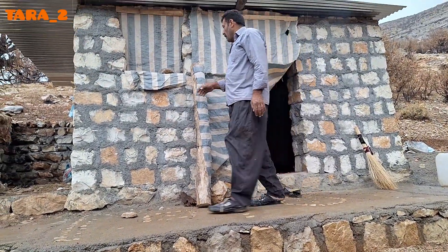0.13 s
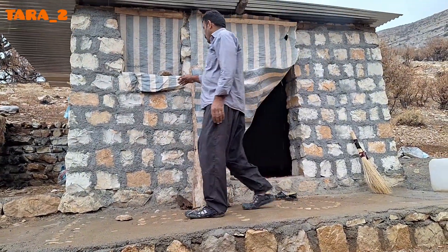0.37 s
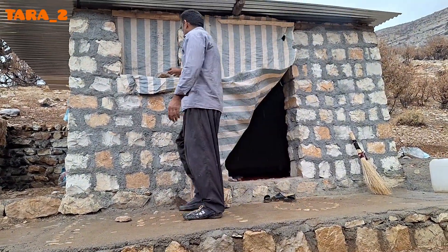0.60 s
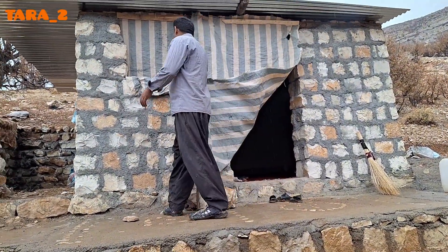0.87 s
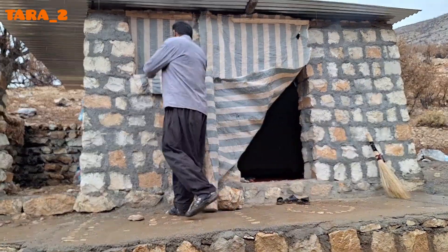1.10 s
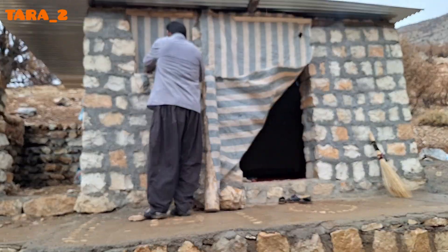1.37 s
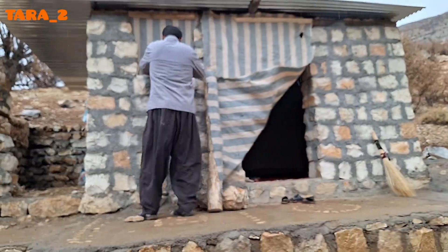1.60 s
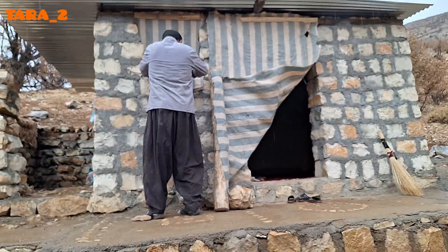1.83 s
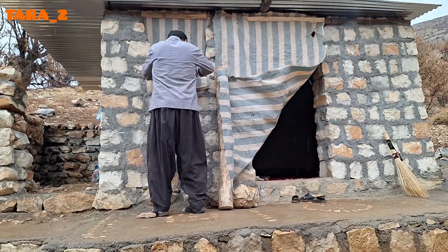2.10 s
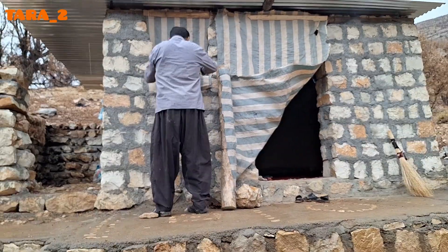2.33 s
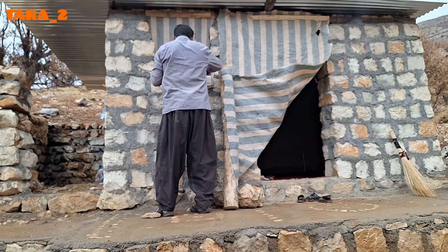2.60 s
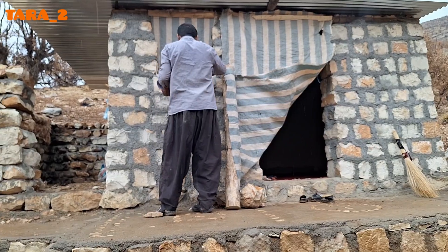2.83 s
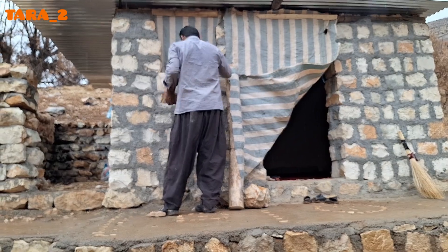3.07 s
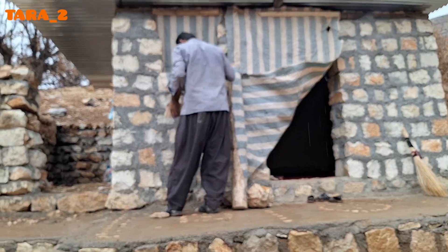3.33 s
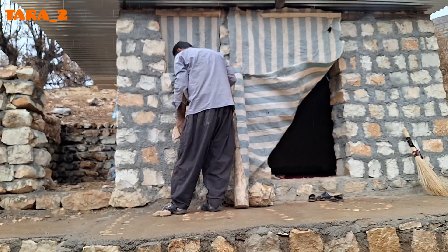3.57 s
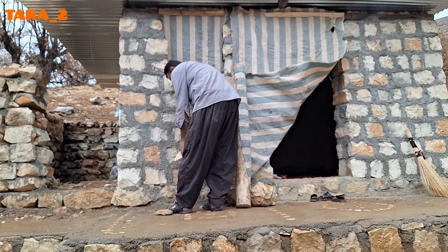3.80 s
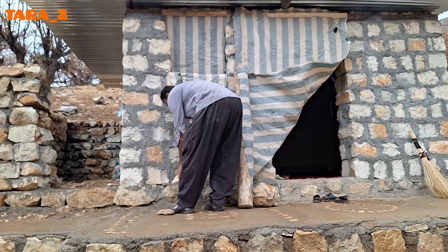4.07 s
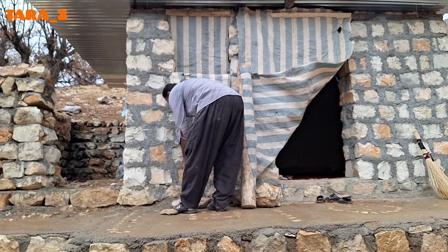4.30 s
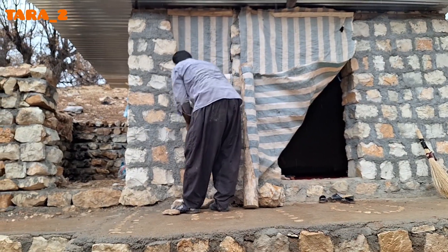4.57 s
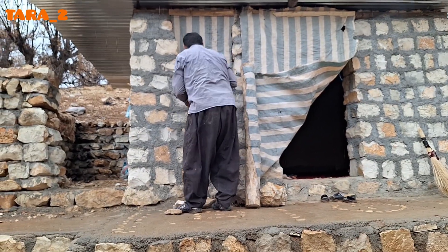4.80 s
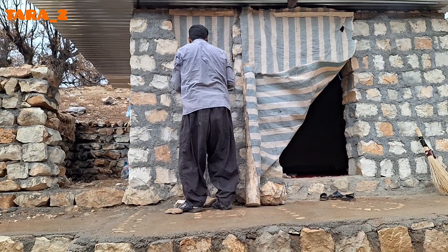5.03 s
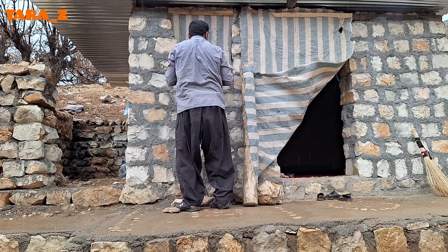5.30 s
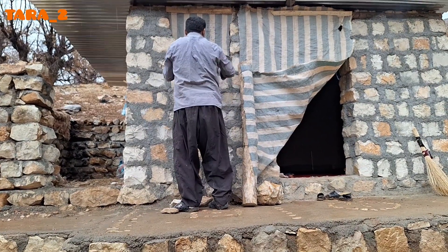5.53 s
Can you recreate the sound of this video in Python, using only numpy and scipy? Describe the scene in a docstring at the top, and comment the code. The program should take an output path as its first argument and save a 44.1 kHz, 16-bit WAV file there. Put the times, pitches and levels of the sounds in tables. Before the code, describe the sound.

Close stereo sound outdoors by a stone wall, with a very soft hiss of light rain and sparse tiny ticks throughout. From the start a woven plastic tarp crackles: sharp, dry crease snaps at irregular spacing, with rustling bursts and low, loose flaps. Soles scuff gritty concrete at about 0.1-0.3 s and again near 0.75 s. Snaps crowd together between 1.3 and 1.8 s, with a fuller rustle and flap around 2.2 s. Handling continues more thinly, swelling near 3.2 and 3.7 s, with more crisp snaps around 4 s. At 4.28 s a stone drops on the concrete, the loudest event: a low thud and hard, gritty knock, a strong second hit at 4.32 s, a bright stone clink near 4.37 s, then weaker bounces to 4.53 s and a faint last tap at 4.7 s. Short dull echoes follow. Sparse crackles and a light flap finish by 5.6 s.

```python
"""First to be heard are creases snapping in a woven plastic tarp, over a soft hiss of light rain.
A man handles the tarp outdoors by a stone wall: it rustles and flaps, and his soles scuff the concrete.
Later a stone that weighed it down is dropped on the concrete, bounces, clinks on another stone and settles.
Cracks are short noise bursts, rustle is clumped grains, sheet and stone are ringing modes, rain is
banded noise. Two microphones pick it up, with a few echoes off wall and ground."""
import sys
import numpy as np
from scipy import signal
from scipy.fft import rfft, irfft
from scipy.io import wavfile
from scipy.ndimage import uniform_filter1d, minimum_filter1d

SR = 44100
rng = np.random.default_rng(int(sys.argv[2]) if len(sys.argv) > 2 else 0)


def log_audio(samples):
    """Write samples as a 16-bit WAV file to the path given in sys.argv[1]."""
    # one column per channel
    frames = np.atleast_2d(samples).T
    # limit to full scale, then quantise
    limited = np.clip(frames, -1, 1)
    pcm = np.round(limited * 32767).astype(np.int16)
    wavfile.write(sys.argv[1], SR, pcm)


def volts_from_decibels(level):
    """Turn decibel levels (scalar or array-like) into linear amplitude factors."""
    exponent = np.asarray(level, float) / 20
    return 10 ** exponent


N = 249606

# light rain, spectrum shape: [f/Hz, level/dB]
RAIN_SPECTRUM = [(18, -35), (30, -6), (76, 8), (350, -9.5), (694, -5), (1180, -2), (2600, -1.5),
                 (5890, -10.5), (7280, 1), (9230, -21.5), (14100, -15.5), (15200, -13), (16500, -30)]
RAIN_DB = -62  # rms of the hiss on its way to the microphones
# how alike the rain is left and right: [f/Hz, likeness, clipped to -1 (opposite) .. 1 (same)]
RAIN_LIKENESS = [(60, 0.96), (180, 1), (550, -0.41), (1650, -0.75), (4970, -1.4), (15000, -1.8)]
# big creases that snap: [t/s, crack level/dB, body over crack/dB, treble over crack/dB, left over right/dB]
BIG_SNAPS = [(0.0218, -22, 0, -1, 2.5), (0.075, -35, -5.5, -9, 3), (0.096, -36, -3, 9, -1),
             (0.1443, -28, -8, -13, -10), (0.1546, -37, 2, -17, 13), (0.1763, -35, -9, -3, -15),
             (0.2776, -37, 5.5, -10, 1), (.3069, -46, -10, 2, 6), (0.3202, -31, -2, -2, 1),
             (0.3253, -21.5, -3.5, -1.5, 6.5), (0.3424, -35, -19, -8, -9), (0.3748, -39.5, -9, 5, -4),
             (0.461, -32, -9, 0, -1), (0.4785, -27.5, -4, -9, 2), (0.5623, -30.5, -10, -17, 3),
             (0.6284, -32.5, -7, -3, 3), (0.7737, -20.5, -27, -16, -1.5), (0.9066, -28, -13, -5, 4),
             (0.9387, -23.5, 0.5, -12, 3), (0.9482, -30, -27, 3, 0), (1.0051, -34, -8, -4, 2),
             (1.0361, -35, -5, -10, 0), (1.0682, -34.5, -5.5, -13, -4), (1.3366, -36, -5.5, -4, -3),
             (1.3507, -32.5, 3, 8.5, 0), (1.3602, -39, -1, 3, -2), (1.408, -37, 5, -10, 3),
             (1.4207, -34.5, 8, -24, -2), (1.447, -28.5, 2, -18, -1), (1.468, -31.5, 4, -11, 3),
             (1.4949, -36, 3, -13, -1), (1.5234, -33, -21, -5, -10), (1.569, -22.5, 0.5, -6, 0),
             (1.6522, -30, -3.5, -4, -1), (1.6761, -36, -10, 10, 0), (1.7097, -24, -2.5, -14, 1.5),
             (1.7285, -25, 0, 0.5, 2.5), (1.7738, -26.5, 2.5, -20, 1.5), (1.8236, -26.5, -7, -15, 2.5),
             (1.971, -34.5, -21, -4, 0), (2.0666, -33.5, -10, -5, 2), (2.252, -33, -3, -4, 2),
             (2.4186, -36, -18, -6, 3), (2.546, -34, -22, -4, 3), (2.5562, -36.5, -10, -2, 5),
             (2.6286, -33.5, -11.5, -11, 4), (2.6587, -31.5, -12, -5, 7), (2.7715, -43, 5, -6, 3),
             (2.8141, -27, -2.5, -6, 2.5), (2.8354, -31.5, -5, 2, 6), (2.9637, -37.5, -0.5, 0, 1),
             (3.1056, -32, 0, -7, 4), (3.1329, -28.5, -3.5, -13, 0), (3.1933, -25, 0.5, -4, 2.5),
             (3.2428, -38, -4, 0, 2), (3.3094, -37, -11, -6, 1), (3.335, -32.5, -11, 0, 6),
             (3.4423, -33, -28, -11, 5), (3.4488, -30, -2, 8.5, 1), (3.5058, -28.5, -10.5, -17, 2),
             (3.5551, -30, -8, -1.5, 4), (3.6727, -26.5, -12.5, -26, 1), (3.7665, -33, -15, -10, 3),
             (3.8362, -33, -4, 1.5, 7), (3.8483, -34.5, -1.5, -12, -1), (3.9281, -24, -13, -5, 0.5),
             (3.9395, -34, -19, -12, 5), (3.9721, -27.5, -2, 6, 1), (3.9864, -30, -9, -9, 6),
             (4.0615, -37, -26, -8, -9), (4.0756, -33, -3, -11.5, 4), (4.1063, -31.5, -11, -4, 0),
             (4.1895, -32.5, -5, -5, -1), (4.5395, -33.5, -18, -1, 7), (4.5977, -31.5, -14, -18, 0),
             (4.8092, -36.5, -15, -5, 3), (4.8338, -38, -12, -2, 5), (5.007, -27, 0, 3, 6),
             (5.0958, -33, 0, -11, 5.5), (5.2498, -36, -4, -9, 8), (5.3886, -46, 5.5, 8.5, 0),
             (5.5606, -29.5, -9, -4, 6), (5.5681, -32.5, -7, -7.5, -0.5)]
# small creases, snapping at random; rows are crack level, body, treble and left over right: [mean/dB, spread/dB]
SMALL_SNAP_SPREAD = [(-44, 2), (-9, 6), (-4, 5.8), (3, 1.9)]
SMALL_SNAP_COUNT = 120
# echoes off wall and ground: [delay/s, level/dB]
ECHOES = [(.0072, -16), (0.013, -18.5), (0.021, -20.5), (.027, -46.5), (.039, -24)]
# soles scuffing the concrete, one curve per scuff: [t/s, level/dB]
SCUFF_CURVES = [
    [(.088, -90), (.096, -42), (.13, -51), (.18, -52), (.24, -40), (.27, -53), (.3, -98)],
    [(.74, -97), (.765, -45), (.775, -47), (.8, -59), (.83, -88)],
]
# resonances the sole rasps with: [f/Hz, width/Hz, level/dB]
SOLE_BANDS = [(740, 150, 0), (2280, 480, 7.5), (4330, 1200, 0)]
# colour of the rustling: [f/Hz, level/dB]
RUSTLE_SPECTRUM = [(150, -32), (250, 7), (349, -10.5), (408, 0), (809, 3.5), (1210, -2), (2280, 1),
                   (7900, -12), (9250, -20), (12000, -10.5), (15400, -16), (16500, -41)]
# rustling swells: pulls on the sheet and, at 4.3 s, crunch under the dropped stone:
# [start t/s, length/s, level at the end/dB, swell on the way/dB, treble over rustle/dB]
RUSTLE_SWELLS = [(.096, 0.14, -41, 9.5, 2), (.165, 0.018, -45.5, -3, 4), (.34, 0.067, -63.5, 2, 2),
                 (.45, 0.091, -57.5, 1, -5), (.6, 0.064, -55.5, 7, -4), (.69, 0.098, -45.5, 11.5, 0.5),
                 (.99, 0.091, -54, 12, -2), (1.26, 0.0096, -56.5, -2, -0.5), (1.35, 0.1, -39.5, 12, -9.5),
                 (1.47, 0.099, -49.5, -6, -5), (1.65, 0.065, -58.5, -5, -5.5), (1.75, 0.015, -46.5, 28, -7),
                 (1.96, 0.0089, -53, -4, -3), (2.08, .1, -55.5, 7, 3), (2.19, 0.13, -48.5, 7.5, -2),
                 (2.39, 0.12, -62, 5.5, -1), (2.6, 0.13, -62, 5, -1.5), (2.82, 0.13, -56.5, 9.5, 2.5),
                 (3.0, .14, -51.5, 0, -2.5), (3.15, 0.027, -54, 2, -7), (3.31, .03, -60.5, -1, -4),
                 (3.45, 0.29, -51.5, 14, -2.5), (4.08, 0.16, -66, 2, 0), (4.3, .17, -48.5, -5, -13),
                 (4.48, 0.062, -58.5, 2, -3.5), (4.62, 0.052, -66.5, -8.5, -14),
                 (4.76, .2, -72, -4.5, -7.5), (5.25, 0.16, -58.5, 13, -0.5)]
SWELL_RISE_DB_PER_S, SWELL_FALL_DB_PER_S, RESTING_RUSTLE_DB = 904, 303.5, -71.5
# flaps of the sheet: [start t/s, length/s, level at the end/dB, swell on the way/dB, tautness/dB per octave]
SHEET_FLAPS = [(.096, 0.15, -51.5, 3, -4), (.32, 0.013, -50, 6, -4), (.722, 0.0081, -44, 10, 9),
               (.778, 0.011, -51.5, 0, -2), (.934, 0.018, -58, 6, -6), (1.35, 0.2, -54, 4, 8),
               (1.6, 0.15, -51.5, 8, -2.5), (1.865, 0.018, -53.5, -1, 3), (1.94, 0.041, -45.5, 13, -0.5),
               (2.09, .015, -56, -5, 2), (2.15, 0.16, -41.5, 4.5, -0.5), (2.39, 0.18, -67, -0.5, -9.5),
               (2.74, 0.013, -61, -2, 5), (2.81, 0.4, -48, 16, 0.5), (3.6, 0.17, -75, -11, 5),
               (4.25, 0.4, -56, 20, -5), (4.75, 0.096, -71.5, -4, -10), (5.005, 0.013, -65, 2, -11),
               (5.15, 0.28, -65.5, 17, 5)]
FLAP_RISE_DB_PER_S, FLAP_FALL_DB_PER_S, RESTING_FLAP_DB = 900, 346, -76
# the slack sheet as a drum, its low modes: [f/Hz, level/dB, t60/s]
SHEET_MODES = [(68.6, 2, 0.089), (118, -7, 0.17), (158.4, 3.5, 0.1), (203, -6.5, 0.12), (281, -9.5, 0.017),
               (190.4, -5.5, 0.15)]
# a big snap stirs the sheet for a moment: rustle and flap relative to its crack level
STIR_S, STIR_RUSTLE_DB, STIR_FLAP_DB = 0.01, -29.5, -41
# blows of the stone: [t/s, thud level/dB, knock level/dB, knock tilt/dB per octave]
STONE_BLOWS = [(4.2804, -4, -16, -0.5), (4.2936, -22, -28.5, -24), (4.3207, -2.5, -11, -4.5),
               (4.334, -23, -15, -1.5), (4.339, -10, -24, 2), (4.3674, -15, -14, 1),
               (4.4183, -15, -23.5, -7), (4.472, -13, -19.5, -18), (4.508, -28, -38, -6),
               (4.529, -31, -34, -7.5), (4.717, -32.5, -39.5, -12)]
# modes of the ground under the blow: [f/Hz, level/dB, t60/s]
GROUND_MODES = [(75, -11, 0.042), (129, -3, 0.087), (145, -5, .06), (177, -3, 0.074), (252, -5, 0.078),
                (325, -9.5, .04), (432, -11.5, 0.046)]
# the stone's duller modes: [f/Hz, level/dB, t60/s]
KNOCK_MODES = [(490, -0.5, 0.01), (597, 1.5, 0.053), (690, 0, 0.019), (850, -0.5, .045), (950, -7, 0.031),
               (1147, -5.5, 0.055), (1380, -6, 0.046), (1690, -3.5, 0.026), (2120, -10.5, 0.021)]
# crunch under the stone, by octave: [f/Hz, level/dB, t60/s]
GRIT_BANDS = [(394, -11.5, 0.12), (840, -4.5, 0.067), (1580, -0.5, 0.043), (3130, -10.5, .05),
              (6400, -31.5, 0.071)]
# stone on stone: [t/s, then level/dB of each of the five clink groups]
STONE_CLINKS = [(4.2816, -61, -55, -38, -59, -38), (4.332, -37, -21, -31, -20.5, -40),
                (4.3666, -6, -33, -15.5, -49.5, -37), (4.408, -50.5, -42.5, -49, -47.5, -56.5),
                (4.474, -64.5, -51.5, -41, -60, -65), (4.507, -60.5, -55, -57, -64, -64)]
# the stone's clink modes, in groups struck together: [f/Hz, level/dB, t60/s]
CLINK_GROUPS = [
    [(2798, 0, .075)],
    [(2882, 0.0017, 0.17)],
    [(4020, 0, 0.064), (4110, -18, 0.18)],
    [(4770, -0.5, .07), (4820, -21, 0.26)],
    [(5520, 2, 0.11), (5680, -6.5, .07)],
]
# balance of the two microphones: [f/Hz, left over right/dB]
MICROPHONE_LEAN = [(60, 4), (110, -0.5), (200, -0.5), (380, -1), (700, -2.5), (1290, -2.5), (2380, -6.5),
                   (4400, -7.5), (8120, -6), (15000, -18.5)]
CEILING_DB, LOOK_AHEAD_S = -1.5, 0.004


def in_time(rows):
    """Columns of a curve table at every sample."""
    s, *columns = np.transpose(rows)
    return [np.interp(np.arange(N) / SR, s, column) for column in columns]


def at_hz(points, hz):
    """A spectrum read on a log-frequency axis."""
    point_hz, values = np.transpose(points)
    return np.interp(np.log(hz + 1), np.log(point_hz), values)


def rms_one(x):
    """Scaled to rms 1, all channels together."""
    return x / np.sqrt(np.mean(np.square(x)) + 1e-20)


def band(x, low_hz, high_hz):
    """Butterworth band-pass."""
    sos = signal.butter(2, [low_hz, min(high_hz, 0.45 * SR)], "band", fs=SR, output="sos")
    return signal.sosfilt(sos, x)


def low_pass(x, hz):
    """Butterworth low-pass."""
    return signal.sosfilt(signal.butter(2, hz, fs=SR, output="sos"), x)


def colour(x, db_at):
    """Causal (minimum-phase) filter with the given dB at each frequency."""
    cepstrum = irfft(np.log(volts_from_decibels(db_at(np.linspace(0, SR / 2, 2049)))))
    cepstrum[1:2048] *= 2      # folding the cepstrum gives minimum phase
    cepstrum[2049:] = 0
    return signal.fftconvolve(x, irfft(np.exp(rfft(cepstrum))))[:N]


def drift(rate_hz):
    """Slow random wander of rms 1: noise through two equal poles, drawn every 40 samples."""
    r = np.exp(-80 * np.pi * rate_hz / SR)
    noise = rng.standard_normal(N // 40 + 2002)
    slow = signal.lfilter([1], [1, -2 * r, r * r], noise)[2000:]
    return np.interp(np.arange(N) / 40, np.arange(len(slow)), rms_one(slow))


def ring(clicks, hz, t60):
    """A mode: each unit click sets a decaying sine of height 1 ringing."""
    r, w = volts_from_decibels(-60 / (t60 * SR)), 2 * np.pi * hz / SR
    return signal.lfilter([0, np.sin(w)], [1, -2 * r * np.cos(w), r * r], clicks + 1e-18)


def pan(db):
    """Gains of left and right."""
    return np.array([volts_from_decibels(db / 2), volts_from_decibels(-db / 2)])


def grains(per_s, spread_db, clumps_db, widest_lag_s):
    """Tiny clicks in clumps, dealt to nine spots that reach the two microphones at different times."""
    born = rng.random(N) < per_s * volts_from_decibels(clumps_db) / SR
    heights = volts_from_decibels(spread_db * np.minimum(rng.exponential(1, N), 4))
    clicks = born * heights * rng.choice([-1, 1], N)
    spot, out = rng.integers(0, 9, N), np.zeros((2, N))
    for k, lag_s in enumerate(np.linspace(-widest_lag_s, widest_lag_s, 9)):
        out[0] += np.roll(clicks * (spot == k), round(lag_s * SR))
    out[1] = clicks
    return rms_one(out)


def rain(patchy_db):
    """Half-octave bands of hiss, each flickering a little; likeness sets same or opposite sign at the ears."""
    out, together = 0, drift(8.0)
    edges = 30 * 2 ** np.arange(0, 9.6, 0.5)
    white = rng.standard_normal((2, 2, N))
    for k, (low, high) in enumerate(zip(edges, edges[1:])):
        mid, side = band(white[k % 2], low, high)      # neighbouring bands use different noise
        hz = np.sqrt(low * high)
        alike = np.clip(at_hz(RAIN_LIKENESS, hz), -1, 1)
        gain = volts_from_decibels(at_hz(RAIN_SPECTRUM, hz) + patchy_db * (together + drift(10.8)))
        out = out + gain * (np.sqrt(1 + alike) * mid + np.sqrt(1 - alike) * side * [[1], [-1]])
    return volts_from_decibels(RAIN_DB) * rms_one(out)


def patter(per_s, level_db):
    """Lone drops and small creases tick here and there, in four pitch ranges with grains of their own."""
    ranges_hz = [(500, 1700), (1200, 4900), (2500, 6000), (5000, 26000)]
    ticks = [band(grains(per_s, 4.5, 2.2 * drift(2.4), 0.00044), *hz) for hz in ranges_hz]
    return volts_from_decibels(level_db) * sum(rms_one(x) for x in ticks)


def all_snaps():
    """The big creases, and small ones strewn at random among them."""
    mean, spread = np.transpose(SMALL_SNAP_SPREAD)
    when = rng.uniform(0.01, N / SR, (SMALL_SNAP_COUNT, 1))
    chance = np.clip(rng.standard_normal((SMALL_SNAP_COUNT, 4)), -1.5, 1.5)
    return np.vstack([BIG_SNAPS, np.hstack([when, mean + spread * chance])])


def snaps(crack_s=(0.0008, 0.0005, 0.0003), shiver_s=0.0072, shivers_db=(-16.0, -22.0, -30.0)):
    """Each crease gives a sharp crack, shorter in the treble, and a short shiver of the sheet around it."""
    t, out = np.arange(1536) / SR, np.zeros((2, N + 4096))
    rows = all_snaps()
    noise = rng.standard_normal((len(rows), 1538))
    bursts = []
    for decay_s, shiver_db in zip(crack_s, shivers_db):
        envelope = np.exp(-t / decay_s) + volts_from_decibels(shiver_db) * np.exp(-t / shiver_s)
        bursts.append(noise[:, 2:] * envelope + 4.0 * (t == 0))      # a click opens each burst
    body, middle, treble = bursts
    parts = [band(body, 254, 1390),
             band(middle, 850, 3790) + volts_from_decibels(-17.0) * band(middle, 2450, 4170),
             band(treble, 5340, 7600) + volts_from_decibels(-6.5) * band(treble, 10900, 15100)]
    body, middle, treble = [p / np.abs(p).max(axis=1, keepdims=True) for p in parts]
    for k, (s, db, body_db, treble_db, lean_db) in enumerate(rows):
        crack = volts_from_decibels(db) * (volts_from_decibels(body_db) * body[k] + middle[k] + volts_from_decibels(treble_db) * treble[k])
        at = round(s * SR)
        lag = round(3.3 * noise[k, 0] - 5)      # each crease lies elsewhere, mostly nearer the left
        left, right = pan(lean_db)
        out[0, at + lag:at + lag + 1536] += crack * left
        out[1, at:at + 1536] += crack * right
    return out[:, :N]


def wall(x):
    """A few dull echoes off wall and ground, a little later on the left."""
    out = np.zeros((2, N))
    for s, db in ECHOES:
        for ear, later in enumerate([1.06, 1]):
            lag = round(s * later * SR)
            out[ear, lag:] += volts_from_decibels(db) * x[ear, :-lag]
    return band(out, 130, 5700)


def scuffs():
    """Grit dragged under a sole: dense clicks into a few broad resonances."""
    grit = grains(7000.0, 3.3, 2.0 * drift(40.0), 0.0002)
    rasp = sum(volts_from_decibels(db) * band(grit, hz - width_hz / 2, hz + width_hz / 2) for hz, width_hz, db in SOLE_BANDS)
    return sum(volts_from_decibels(in_time(rows)[0]) for rows in SCUFF_CURVES) * rms_one(rasp)


def effort(rows, rise_db_per_s, fall_db_per_s, rest_db):
    """Level of overlapping moves that set in, swell and die away, and their tint weighted by power."""
    start, length, db, swell_db, tint = [column[:, None] for column in np.transpose(rows)]
    t, length = np.arange(0, N + 64, 64) / SR, np.maximum(length, 0.003)
    to_go = 1 - np.clip((t - start) / length, 0, 1)
    before_s = np.maximum(start - t, 0)
    after_s = np.maximum(t - start - length, 0)
    level_db = db - swell_db * to_go - rise_db_per_s * before_s - fall_db_per_s * after_s
    power = volts_from_decibels(2 * level_db)
    total = power.sum(axis=0) + volts_from_decibels(2 * rest_db)
    return in_time(np.transpose([t, 10 * np.log10(total), (power * tint).sum(axis=0) / total]))


def stirred(under_db, tint):
    """The short move of the sheet that comes with each big snap."""
    return [(s, STIR_S, db + under_db, 0, tint) for s, db, *_ in BIG_SNAPS]


def handling(restless_db=5.0, resting_treble_db=2.0, wander_db=2.5):
    """Course of the rustling: swells and snaps raise it, it is never quite still, and it wanders sideways."""
    swells = RUSTLE_SWELLS + stirred(STIR_RUSTLE_DB, -2.5)
    level_db, treble_db = effort(swells, SWELL_RISE_DB_PER_S, SWELL_FALL_DB_PER_S, RESTING_RUSTLE_DB)
    resting = np.clip((RESTING_RUSTLE_DB + 10.5 - level_db) / 10, 0, 1)
    level_db = level_db + restless_db * resting * drift(9.9)
    treble_db = treble_db + resting * resting_treble_db
    lean_db = 1.5 + wander_db * drift(1.5)
    return level_db, treble_db, lean_db


def rustle(level_db, treble_db, lean_db):
    """Large, middling and fine grains share their clumps; the fine ones have a level that varies by swell."""
    clumps_db = 4.0 * drift(50.0)
    large = band(grains(900.0, 3.6, clumps_db, 0.00027), 140, 880)
    middling = band(grains(3000.0, 4.0, clumps_db, 0.00033), 1000, 3100)
    fine = band(grains(7000.0, 2.3, clumps_db, 0.00028), 4200, 22000)

    def rustle_coloured(pair):
        """Both channels filtered by the rustle spectrum, at rms 1."""
        return rms_one([colour(x, lambda hz: at_hz(RUSTLE_SPECTRUM, hz)) for x in pair])

    body, treble = rustle_coloured(large + middling), rustle_coloured(fine)
    return pan(lean_db) * volts_from_decibels(level_db) * (body + volts_from_decibels(treble_db) * treble)


def flap():
    """Uneven tugs set the low modes of the sheet going, nearly alike at both microphones."""
    moves = SHEET_FLAPS + stirred(STIR_FLAP_DB, -6.5)
    level_db, tautness = effort(moves, FLAP_RISE_DB_PER_S, FLAP_FALL_DB_PER_S, RESTING_FLAP_DB)
    tugs = grains(1100.0, 3.5, 0.62 * drift(17.0), 0.00027)
    modes = 0
    for hz, db, t60 in SHEET_MODES:
        gain = volts_from_decibels(db + tautness * np.log2(hz / 120))      # a taut sheet favours its higher modes
        modes = modes + gain * ring(tugs * rng.choice([-1, 1], N), hz, t60)
    return volts_from_decibels(level_db - 26.0) * modes


def struck(times, modes, level_db, tilt_db, scatter_db):
    """Every blow strikes each mode with a strength of its own."""
    at, out = np.round(times * SR).astype(int), np.zeros(N)
    scatter = rng.normal(0, scatter_db, (len(at), len(modes)))
    for k, (hz, db, t60) in enumerate(modes):
        octaves = np.log2(hz / modes[0][0])
        clicks = np.zeros(N)
        clicks[at] = volts_from_decibels(level_db + db + tilt_db * octaves + scatter[:, k]) * (-1) ** (k + 1)
        out += ring(clicks, hz, t60)
    return out


def crunch(times, knock_db, tilt_db, grit_db):
    """Grit under each blow: octave bands of decaying noise, partly shared by both ears."""
    grit = 0
    for hz, db, t60 in GRIT_BANDS:
        kicks = np.zeros(N)
        kicks[np.round(times * SR).astype(int)] = volts_from_decibels(knock_db + db + grit_db + tilt_db * np.log2(hz / 500))
        dying = signal.lfilter([1], [1, -volts_from_decibels(-60 / (t60 * SR))], kicks)
        common, own = rng.standard_normal(N), rng.standard_normal((2, N))
        grit = grit + dying * rms_one(band(common + 0.77 * own, hz / np.sqrt(2), hz * np.sqrt(2)))
    return grit


def stone(grit_db=-2.5, lean_db=0.0, clink_lean_db=-2.5):
    """The ground thuds, the stone knocks with a gritty crunch and clinks where it meets stone."""
    s, thud_db, knock_db, tilt_db = np.transpose(STONE_BLOWS)
    # contact takes a moment, which dulls thud and knock
    thud = low_pass(struck(s, GROUND_MODES, thud_db, 0, scatter_db=3.0), 900.0)
    knock = low_pass(struck(s, KNOCK_MODES, knock_db, tilt_db, scatter_db=3.5), 3500.0)
    grit = crunch(s, knock_db, tilt_db, grit_db)
    s, *levels = np.transpose(STONE_CLINKS)
    clink = sum(struck(s, group, db, 0, scatter_db=0.3) for group, db in zip(CLINK_GROUPS, levels))
    clink = band(clink, 1000, 6200)
    both = thud + pan(lean_db)[:, None] * (knock + grit) + pan(clink_lean_db)[:, None] * clink
    return np.array([np.roll(both[0], -3), both[1]])      # the left microphone is nearer


def scene():
    """Sheet, soles and stone before the wall, in the rain."""
    hits = snaps() + stone()
    hiss = rain(patchy_db=0.8)
    rustle_and_flap = rustle(*handling()) + flap()
    return rustle_and_flap + scuffs() + hits + wall(hits) + hiss + patter(40.0, level_db=-71.0)


def limit(x):
    """The gain dips smoothly around any peak that would pass the ceiling."""
    reach = 2 * round(LOOK_AHEAD_S * SR) + 1
    gain = np.minimum(1, volts_from_decibels(CEILING_DB) / (np.abs(x).max(axis=0) + 1e-9))
    return x * uniform_filter1d(minimum_filter1d(gain, size=reach), size=reach)


def top_cut(x):
    """Nothing passes above the cut-off."""
    return signal.sosfilt(signal.butter(12, 16970, fs=SR, output="sos"), x)


def record(dry):
    """The right microphone hears more treble than the left; both ends are cut and peaks are limited."""
    left = colour(dry[0], lambda hz: at_hz(MICROPHONE_LEAN, hz) / 2)
    right = colour(dry[1], lambda hz: -at_hz(MICROPHONE_LEAN, hz) / 2)
    cut = signal.sosfilt(signal.cheby2(8, 40, 16400, fs=SR, output="sos"), [left, right])
    cut = signal.sosfilt(signal.butter(2, 50.0, "high", fs=SR, output="sos"), cut)
    return top_cut(limit(cut))


dry = scene()
out = record(dry)
log_audio(out)
```